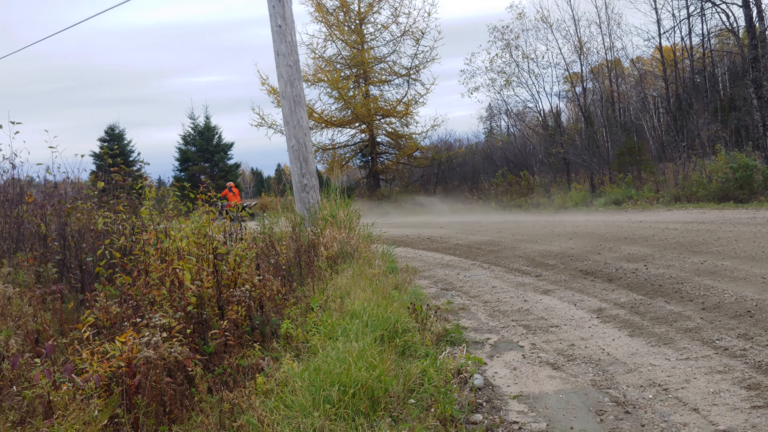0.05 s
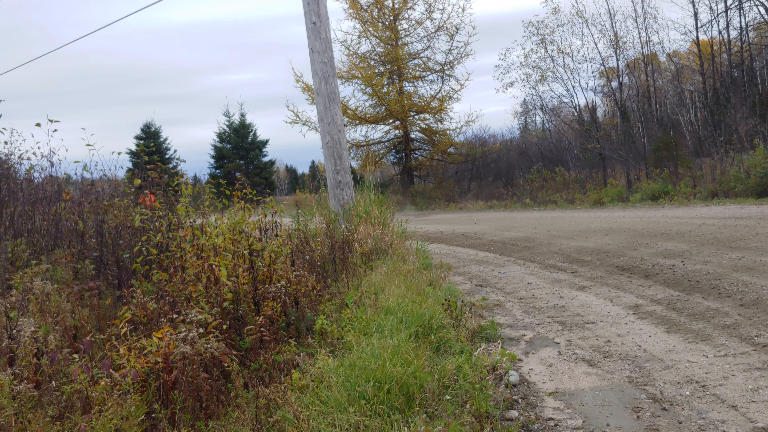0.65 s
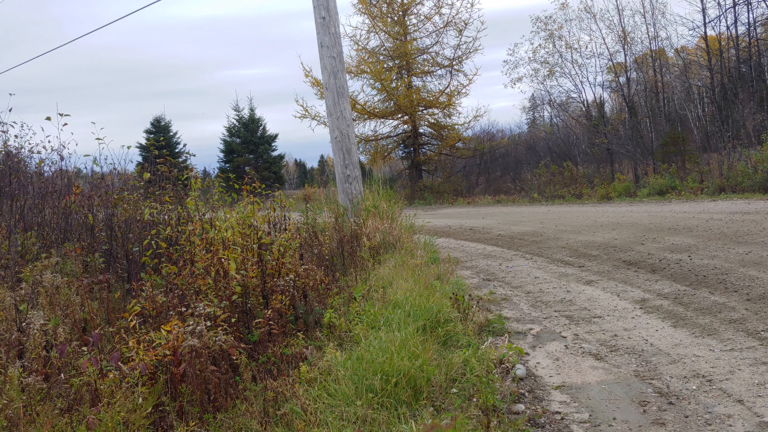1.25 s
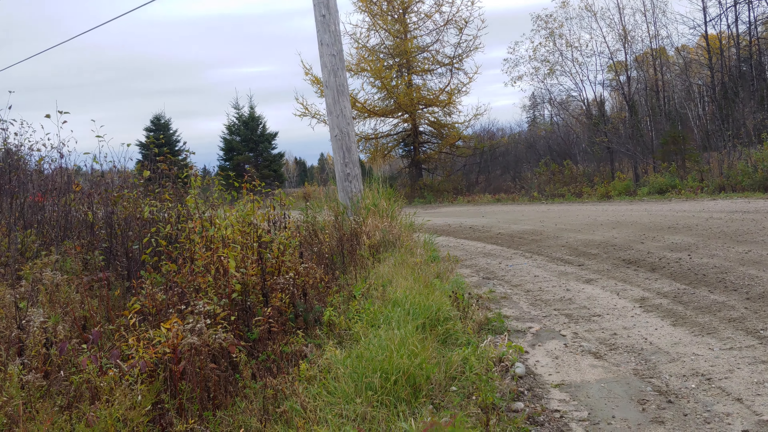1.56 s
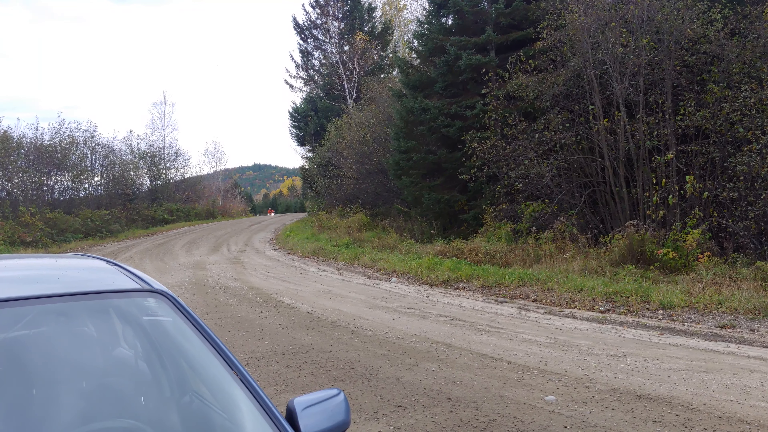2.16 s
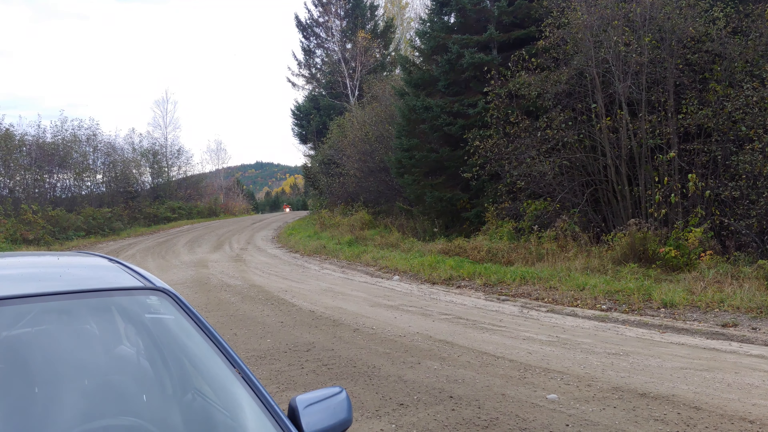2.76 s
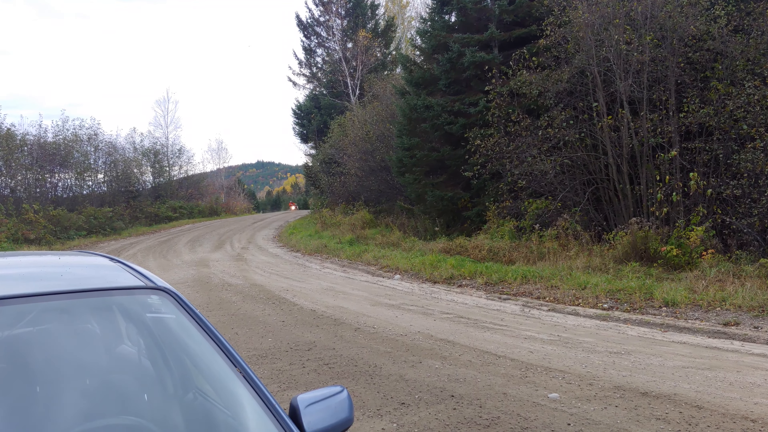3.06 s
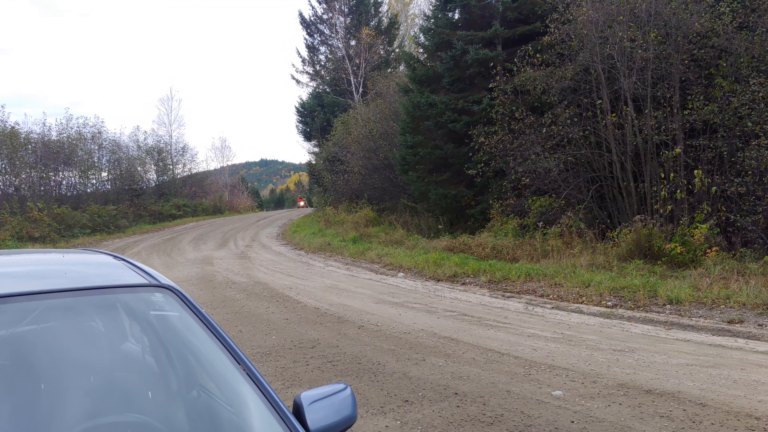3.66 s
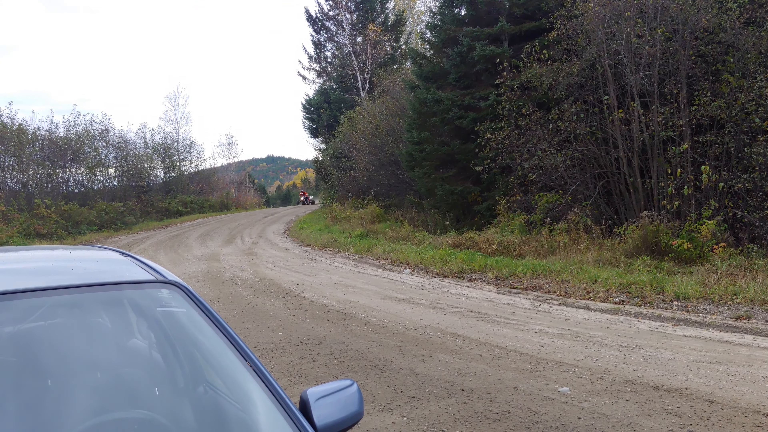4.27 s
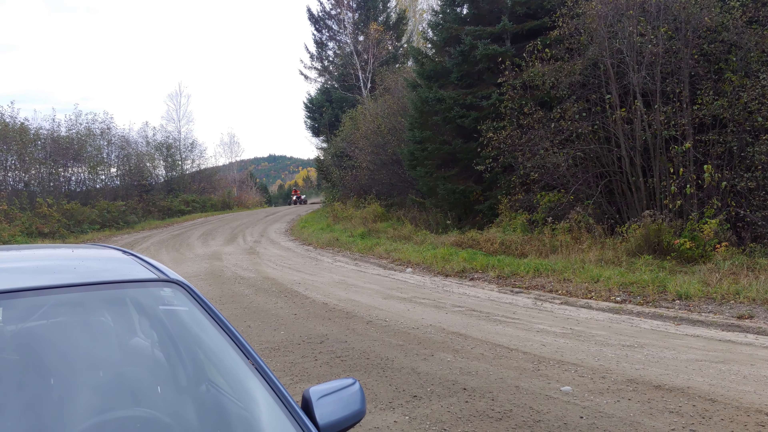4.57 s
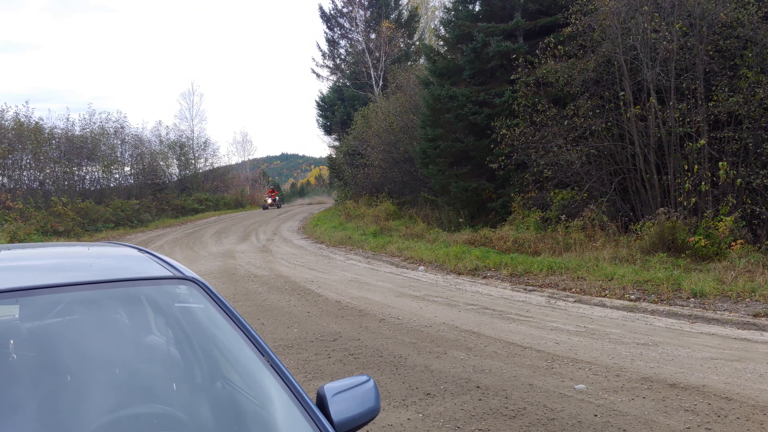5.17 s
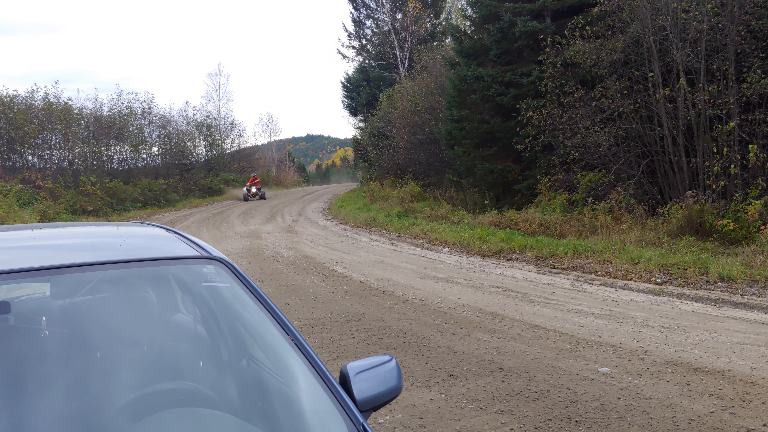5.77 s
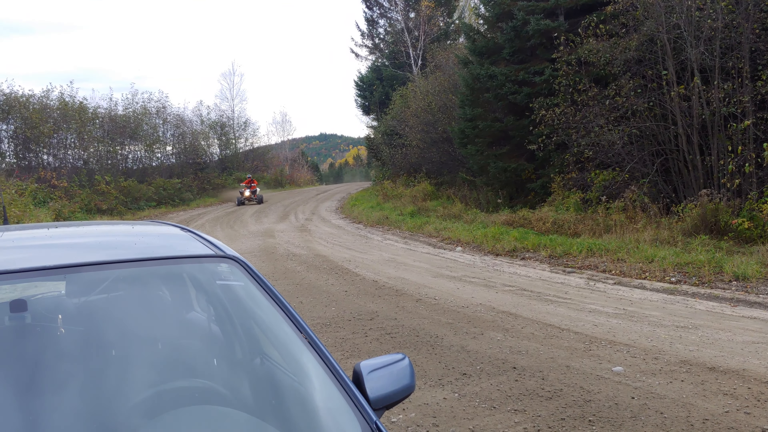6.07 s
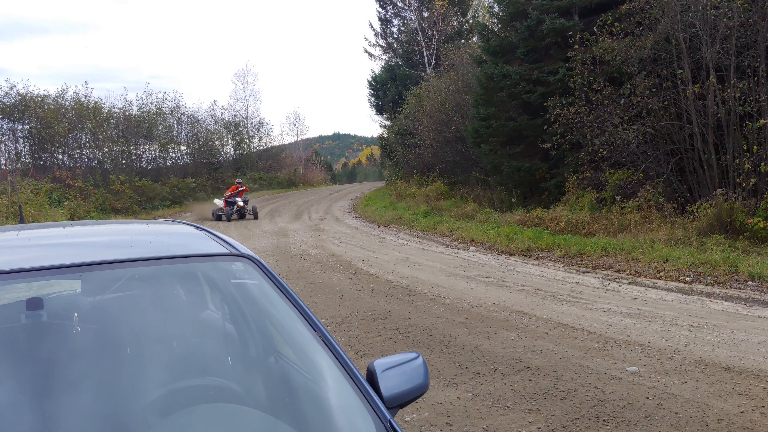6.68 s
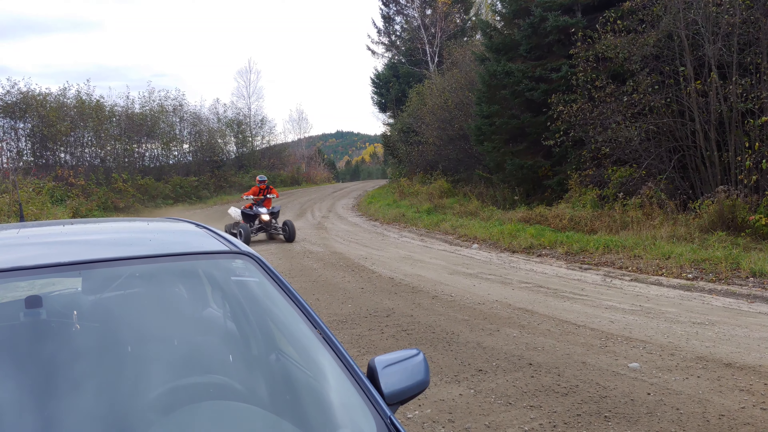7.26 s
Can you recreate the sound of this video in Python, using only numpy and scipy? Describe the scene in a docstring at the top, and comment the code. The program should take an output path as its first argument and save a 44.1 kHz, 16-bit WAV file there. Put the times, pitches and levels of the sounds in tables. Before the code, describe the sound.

From the start, a single-cylinder four-stroke quad bike pulls away outdoors. Its note is deep and loud, with a hard, raspy crack on each firing and a hiss that gradually fades, while the pitch creeps upward. At about 1.5 seconds the sound cuts off abruptly, leaving a short silence. From around 2 seconds the engine fades in far away, dull and droning, and begins to approach. Its pitch rises toward 3.4 seconds, and one small dry tick sounds close to the microphone at about 3.6 seconds. The revs climb and fall back repeatedly, peaking near 4.4, 5.7 and 6.7 seconds, with a surge of growl around 5.3 seconds. The bike grows louder, fuller and raspier as it nears, with a low churn and very faint echoes from the trees. It is still revving when the sound ends at about 7.4 seconds.

```python
"""On a gravel road by a forest, a quad bike with a one-cylinder four-stroke engine is heard twice.
First it pulls away, its exhaust cracking at the listener. After a short silence it fades in far off
and comes closer, the throttle rising and falling; one small tick sounds nearby on the way.
Each firing of the engine is a push of exhaust, a burst of swirling gas and a gulp of fresh air.
The pushes and gulps make the deep note; the gas makes the rasp and hiss."""
import sys
import numpy as np
from scipy import signal
from scipy.fft import rfft, irfft, next_fast_len
from scipy.io import wavfile
from scipy.ndimage import uniform_filter1d, minimum_filter1d, map_coordinates

SR = 44100
rng = np.random.default_rng(int(sys.argv[2]) if len(sys.argv) > 2 else 0)


def master_out(mix):
    """Clip the mix to full scale and print it as 16-bit PCM to the path in sys.argv[1]."""
    frames = np.transpose(np.atleast_2d(mix))
    ceiling = np.clip(frames, -1, 1)
    pcm = np.round(ceiling * 32767).astype(np.int16)
    wavfile.write(sys.argv[1], SR, pcm)


N = 327222
TIME = np.arange(N) / SR
FFT_SIZE = next_fast_len(N + 8192, real=True)
HZ = np.maximum(np.arange(FFT_SIZE // 2 + 1) * SR / FFT_SIZE, 1)

# How fast the engine runs: (time [s], firing rate [Hz])
REVS_AWAY = [(0.0, 52.65), (0.35, 56.03), (0.53, 55.59), (0.98, 57.14), (1.15, 61.22), (1.52, 59.6)]
REVS_TOWARD = [(1.68, 53.9), (2.6, 56.1), (2.86, 57.94), (3.36, 64.27), (3.91, 61.6), (4.39, 72.21),
               (4.86, 69.22), (5.11, 70.16), (5.29, 66.93), (5.59, 71.29), (5.72, 74.65), (5.82, 67.18),
               (6.36, 67.59), (6.73, 75.6), (6.94, 68.14), (7.05, 70.11), (7.18, 66.63), (7.3, 71.68),
               (7.42, 73.47)]
# The tones in the engine's note, from behind, far ahead and near ahead:
# (harmonic [times the firing rate], relative level [dB])
TONES_AWAY = [(1, 9.5), (2, 15), (3, -7), (4, -9), (5, -13), (6, -20), (7, -19.5), (8, -20), (9, -13),
              (10, -15.5), (11, -19.5), (12, -18), (13, -25), (14, -21.5), (15, -19), (16, -16),
              (17, -27.5), (18, -27), (19, -28.5), (20, -45.5), (21, -24.5), (22, -31.5)]
TONES_FAR = [(1, -9), (2, -7.5), (3, -5.5), (4, -5), (5, -6), (6, -4.5), (7, 1), (8, -6.5), (9, -10),
             (10, -8), (11, -9), (12, -16), (13, -9), (14, -23), (15, -37.5), (16, -33.5), (17, -28),
             (18, -41), (19, -31)]
TONES_NEAR = [(1, -6.5), (2, 1.5), (3, -10), (4, -7.5), (5, -2), (6, -11), (7, -24), (8, -18), (9, -9),
              (10, -14.5), (11, -14), (12, -24.5), (13, -32.5), (14, -31.5), (15, -21), (16, -20.5),
              (17, -31.5), (18, -30), (19, -34)]
# Tone colour of the gas and of the low churn of engine and tyres: (frequency [Hz], relative level [dB])
GAS_COLOUR_AWAY = [(450, 7), (650, -2), (900, -1), (1150, -2.5), (1550, 1.5), (2200, 6.5), (3400, -8),
                   (4400, -17), (5600, -21.5), (7000, -20), (7800, -28.5), (8800, -45.5), (11500, -40),
                   (14500, -58)]
GAS_COLOUR_TOWARD = [(800, 8), (1000, -6), (1200, -3.5), (1500, -7), (2100, -2), (2700, -10), (4200, -18.5),
                     (5400, -19.5), (6300, -27), (7050, -22.5), (7900, -35), (8700, -67), (11500, -51),
                     (14500, -67.5)]
CHURN_COLOUR = [(20, -4), (55, -7.5), (95, 16.5), (160, 16.5), (320, 12.5), (450, 11), (700, 11), (900, -5),
                (1200, -48.5)]
# Brief flare-ups of the leaving exhaust: (time [s], bark boost [dB], rasp boost [dB], hiss boost [dB])
EXHAUST_FLARES = [(.19, 0.5, 0, 6.0), (.43, -0.3, 2, 2), (.66, 3.5, 0.5, 1.0), (.93, 4.5, -0.5, 0),
                  (1.02, 2, -1.5, 5.5), (1.23, 1, 1, 6)]
# How alike the noise is in both ears: (frequency [Hz], likeness [ratio, held to 0-1 when used])
EAR_LIKENESS_AWAY = [(500, -0.6), (1000, 13), (2500, -0.6), (7000, 0.4)]
EAR_LIKENESS_TOWARD = [(60, 0.39), (120, 0.93), (240, 0.99), (470, 1), (940, 0.73), (1880, 0.48),
                       (3740, 0.32), (7440, 0.7)]
# Which ear hears more: (frequency [Hz], left minus right [dB])
EAR_BALANCE_AWAY = [(60, 3), (300, .5), (510, 4), (870, 1.5), (1490, -2), (2550, -2), (4350, 13.5),
                    (7000, -8), (10000, 6)]
EAR_BALANCE_TOWARD = [(60, 2), (180, 2), (300, 1), (510, 3), (870, 2), (1490, 0), (2550, -3.5), (4350, 17),
                      (7200, -15.5), (10000, 7)]
# Narrow peaks and dips at each ear: (frequency [Hz], half width [Hz], left [dB], right [dB])
EAR_PEAKS_AWAY = [(1850, 82, -4.5, 2.5), (2060, 160, -1.5, 3), (3850, 190, -1.5, -3.5),
                  (4710, 300, -2, 8.5)]
EAR_PEAKS_TOWARD = [(2050, 370, -3, 2), (2780, 91, 5.5, 2.5), (3500, 51, 4, 2.5), (4200, 180, 2, 8.5),
                    (5400, 150, 5.5, -4), (7300, 100, 3.5, -3.5), (8050, 280, -12.5, 5)]
# The change from the far sound to the near one: (time [s], near share [0-1])
NEAR_SHARE = [(3.1, 0.4), (3.9, 0.38), (4.3, 0.78), (7.4, 1)]
# The deep boom and the mid-pitched bark as the bike comes closer: (time [s], base level [dB])
BOOM_TOWARD = [(2.0, -37.5), (2.9, -27), (4.2, -21.5), (4.7, -19), (5.45, -16.5), (5.68, -14.5), (6.3, -14),
               (7.2, -13.5), (7.42, -14)]
BARK_TOWARD = [(2.0, -44.5), (2.35, -32.5), (3.85, -32), (4.45, -38.5), (4.95, -35.5), (5.4, -26),
               (5.9, -27), (6.45, -25.5), (6.75, -31.5), (7.08, -30), (7.42, -31)]
# The pipe drones at low revs and falls out of tune at high ones: (firing rate [Hz], level over boom [dB])
DRONE_BY_REVS = [(57, -0.9), (63, -2.3), (67.5, -7), (71, -10.5), (75, -10.5)]
# Peaks and dips in the note from far ahead: (frequency [Hz], half width [Hz], boost [dB])
FAR_PEAKS = [(262, 12, 2.5), (335, 13, 1.5), (380, 62, -1.5), (507, 28, -7)]
# A small dry tick close by: (time [s], peak level [dB])
NEARBY_TICKS = [(3.567, -21.0)]

AWAY_ENDS_S, TOWARD_STARTS_S = 1.52, 1.68


def from_db(db):
    """Turn decibels into a number to multiply by."""
    return np.exp(np.asarray(db) * (np.log(10) / 20))


def over_time(table):
    """Join a table's points with straight lines: one value per sample."""
    return np.interp(TIME, *np.transpose(table))


def over_hz(table):
    """Join a table's points with straight lines on an octave scale: one value per frequency."""
    hz, value = np.transpose(table)
    return np.interp(np.log(HZ), np.log(hz), value)


def hump(x, centre, width):
    """A smooth hill of height 1, in time or in frequency."""
    return np.exp(-((x - centre) / width) ** 2)


def band(low_hz, high_hz):
    """Gains that let through only what lies between two frequencies."""
    return 1 / np.sqrt((1 + (low_hz / HZ) ** 16) * (1 + (HZ / high_hz) ** 16))


def colour(sound, gain):
    """Turn each frequency up or down by its own gain."""
    spectrum = rfft(sound.astype(np.float32), FFT_SIZE)
    return irfft(spectrum * gain.astype(np.float32), FFT_SIZE)[..., :N]


def wander(cycles, span=1):
    """A value that glides to a new random number every `span` engine cycles."""
    draws = rng.standard_normal(1024)
    coarse = np.interp(cycles[::8] / span, np.arange(len(draws)), draws)
    return np.repeat(coarse, 8)[:N].astype(np.float32)


def count_cycles(firing_hz, start):
    """Count engine cycles; the exhaust valve opens at each whole number."""
    return np.cumsum(firing_hz) / SR + start + 1


def moving_air(cycles, levels_db, waver_db):
    """Moving air makes each layer's level waver on its own."""
    return [db + waver_db * wander(cycles, span=9) for db in levels_db]


def levels_away():
    """Base levels [dB] of the leaving bike: the boom holds, the drone settles and the hiss fades."""
    flares = sum(np.outer(boosts, hump(TIME, at_s, 0.091)) for at_s, *boosts in EXHAUST_FLARES)
    bark_flare, rasp_flare, hiss_flare = flares
    sag_db = 2.2 * hump(TIME, 0.72, 0.43)   # the low end sags in mid-turn
    boom_db = -14 - sag_db
    drone_db = -24 + 4.5 * hump(TIME, 0, 0.66) - sag_db
    bark_db = -25.5 + 1.5 * hump(TIME, 0.66, 0.31) + bark_flare   # the pipe swings to face the listener
    rasp_db = -25 + rasp_flare
    hiss_db = -29.5 - 4 * TIME + hiss_flare
    return boom_db, drone_db, bark_db, rasp_db, hiss_db


def ground_dip_db(hz):
    """Sound bouncing off the ground cuts a dip into the note; it slides down as the bike leaves."""
    centre_hz = 442 * 2 ** (-0.45 * TIME)
    return 5.5 * hump(hz, centre_hz, 55)


def engine_note(cycles, tone_db, groups, pipe_harmonic, intake, intake_lag, smear, jitter, flutter_db):
    """Tones timed by the exhaust push and later air gulp; groups are (harmonics, joint level [dB])."""
    unevenness = jitter * wander(cycles)   # no two burns take equally long
    angle = (2 * np.pi * (cycles % 1 + unevenness)).astype(np.float32)
    note = np.zeros(N)
    for harmonics, level_db in groups:
        gains = [from_db(tone_db[k - 1]) for k in harmonics]
        scale = from_db(level_db) * np.sqrt(2 / sum(gain ** 2 for gain in gains))
        for k, gain in zip(harmonics, gains):
            pipe_ratio = 1j * k / pipe_harmonic
            push = pipe_ratio / (1 + pipe_ratio) ** 2   # a sharp push, then suction in the pipe
            push *= np.exp(-1j * np.pi * smear * k * k)   # high tones linger in the silencer
            gulp = intake * np.exp(-(k / 3.53) ** 2 - 2j * np.pi * k * intake_lag)
            phase = float(np.angle(push + gulp))
            flutter = from_db(flutter_db * np.sqrt(k) * wander(cycles, span=5))   # air shakes highs most
            note += scale * gain * flutter * np.cos(k * angle + phase)
    return note


def turbulence(cycles, repeat):
    """Two noises that partly repeat from firing to firing, since the gas takes the same path."""
    fresh = rng.standard_normal((2, 560, 1024))   # noise, firing, sample within the firing
    flow = signal.lfilter([np.sqrt(1 - repeat ** 2)], [1, -repeat], fresh, axis=1)
    firing = cycles.astype(int)
    samples_since_firing = np.arange(N) - np.searchsorted(firing, firing)
    return flow[:, firing, samples_since_firing]


def gas_rush(cycles, gain, likeness, repeat, opens_at, rise, steady, uneven_db):
    """Gas bursts that swell for `rise` cycles and die away, over a steady rush; stereo, at 0 dB."""
    burst_cycles = cycles - opens_at
    age = burst_cycles % 1 / rise
    strength = from_db(uneven_db * np.tanh(wander(np.floor(burst_cycles))))
    burst = strength * (age * np.exp(1 - age)) ** 2
    noise = turbulence(cycles, repeat) * np.hypot(burst, steady)
    alike = np.clip(over_hz(likeness), 0, 0.999)
    shared, side = colour(noise, gain * np.sqrt([1 + alike, 1 - alike]))
    stereo = np.array([shared + side, shared - side])
    return stereo / np.sqrt(np.mean(stereo ** 2) + 1e-20)


def ears(sound, balance, peaks):
    """Give each ear a tone colour of its own."""
    broad_db = over_hz(balance) * np.array([[0.5], [-0.5]])
    narrow_db = sum(np.outer(pair_db, hump(HZ, hz, width)) for hz, width, *pair_db in peaks)
    return colour(sound, from_db(broad_db + narrow_db))


def drift_left(sound):
    """As the bike moves off to the left, its sound reaches the right ear ever later."""
    left, right = sound
    lag_s = np.interp(TIME, [0, AWAY_ENDS_S], [0.00007, 0.00017])
    return np.array([left, map_coordinates(right, [(TIME - lag_s) * SR], order=3)])


def pulling_away():
    """The pipe points at the listener: a deep note with a hard crack on every firing."""
    firing_hz = over_time(REVS_AWAY)
    cycles = count_cycles(firing_hz, start=0.16)
    boom_db, drone_db, bark_db, rasp_db, hiss_db = moving_air(cycles, levels_away(), waver_db=-0.35)
    pitched_bark_db = bark_db - 7   # part of the bark is pitched, the rest is rushing gas
    groups = [(range(1, 3), boom_db - 0.6), (range(3, 9), drone_db + 3), (range(9, 23), pitched_bark_db)]
    tone_db = [db - ground_dip_db(k * firing_hz) for k, db in TONES_AWAY]
    note = engine_note(cycles, tone_db, groups, pipe_harmonic=2.3, intake=0.57, intake_lag=0.43,
                       smear=0.0047, jitter=0.0057, flutter_db=0.89)
    gas_colour = from_db(over_hz(GAS_COLOUR_AWAY))
    bark = gas_rush(cycles, gas_colour * band(610, 1340), EAR_LIKENESS_AWAY,
                    repeat=0.4, opens_at=-0.0045, rise=0.12, steady=0.065, uneven_db=0.5)
    rasp = gas_rush(cycles, gas_colour * band(1200, 4700), EAR_LIKENESS_AWAY,
                    repeat=0.33, opens_at=0.00064, rise=0.097, steady=0.18, uneven_db=4.5)
    hiss = gas_rush(cycles, gas_colour * band(3550, 14000), EAR_LIKENESS_AWAY,
                    repeat=0.31, opens_at=-0.011, rise=0.1, steady=0.17, uneven_db=5.5)
    gas = from_db(bark_db) * bark + from_db(rasp_db - 0.7) * rasp + from_db(hiss_db - 0.06) * hiss
    burn_strength = from_db(0.77 * wander(cycles))
    return drift_left(ears(burn_strength * (note + gas), EAR_BALANCE_AWAY, EAR_PEAKS_AWAY))


def throttle_db(firing_hz):
    """The rasp hardens while the throttle is open and the revs climb."""
    climb_hz_per_s = uniform_filter1d(np.gradient(firing_hz) * SR, size=int(0.14 * SR) + 1)
    return 0.03 * np.maximum(climb_hz_per_s, 0)


def levels_toward(firing_hz, near):
    """Base levels [dB] of the nearing bike: rasp and hiss gain on the boom as the distance shrinks."""
    last_distance_m, closing_m_per_s = 6.4, 16.5
    distance_doublings = np.log2(1 + closing_m_per_s * (TIME[-1] - TIME) / last_distance_m)
    boom_db, bark_db = over_time(BOOM_TOWARD), over_time(BARK_TOWARD)
    drone_db = boom_db + np.interp(firing_hz, *np.transpose(DRONE_BY_REVS))
    rasp_db = boom_db - 9.5 - 1.54 * distance_doublings + throttle_db(firing_hz)
    hiss_db = boom_db - 16 - 0.5 * distance_doublings
    hiss_db += 0.46 * (firing_hz - 70.6)   # faster firing hisses more
    hiss_db -= 12.5 * (1 - near)   # the trees at the bend hide the hiss
    # once faded in, the hiss never drops below a faint, steady level
    hiss_db = 20 * np.log10(np.hypot(from_db(hiss_db), from_db(-60.5)))
    fade_in_db = 63.5 * np.clip(TIME - 1.988, -1, 0)
    return [db + fade_in_db for db in (boom_db, drone_db, bark_db, rasp_db, hiss_db)]


def note_from_ahead(cycles, near, boom_db, drone_db, bark_db):
    """The engine's note with a strong intake gulp, blending from its far sound to its near one."""
    tone_db = [far_db + near * (near_db - far_db)
               for (_, far_db), (_, near_db) in zip(TONES_FAR, TONES_NEAR)]
    tone_db[0] -= 12 * np.clip((1.8 - TIME) / 0.02, 0, 1)   # the lowest tone comes in last
    pitched_bark_db = bark_db - 0.2 - 1.6 * near   # close by, part of the bark is churning noise
    groups = [(range(1, 4), boom_db), (range(4, 7), drone_db), (range(7, 20), pitched_bark_db)]
    note = engine_note(cycles, tone_db, groups, pipe_harmonic=4.46, intake=1.0, intake_lag=0.4787,
                       smear=0.0062, jitter=0.0069, flutter_db=0.82)
    note = colour(note, from_db(1.5 * hump(HZ, 301, 50)))   # the pipe favours tones near 301 Hz
    far_peaks_db = sum(db * hump(HZ, hz, width) for hz, width, db in FAR_PEAKS)
    return near * note + (1 - near) * colour(note, from_db(far_peaks_db))


def dulled_by_distance(hiss, hiss_db):
    """Distance swallows the very top first, so the fainter the hiss, the duller it is."""
    sizzle = colour(hiss, band(9000, SR))
    share_left = from_db(2.1 * np.minimum(hiss_db + 33, 0))
    return hiss - (1 - share_left) * sizzle


def forest_echoes(sound, echo_db, delays_s):
    """The forest edge throws back a few weak echoes, mostly of the middle range."""
    echoes = sum(np.exp(-2j * np.pi * HZ * delay) for delay in delays_s)
    return colour(sound, 1 + from_db(echo_db) * band(400, 4500) * echoes)


def coming_closer():
    """The pipe points away: the intake leads, and the trees smear the cracks into a throbbing rasp."""
    firing_hz, near = over_time(REVS_TOWARD), np.clip(over_time(NEAR_SHARE), 0, 1)
    cycles = count_cycles(firing_hz, start=0.12)
    levels_db = levels_toward(firing_hz, near)
    boom_db, drone_db, bark_db, rasp_db, hiss_db = moving_air(cycles, levels_db, waver_db=0.7)
    note = note_from_ahead(cycles, near, boom_db, drone_db, bark_db)
    gas_colour = from_db(over_hz(GAS_COLOUR_TOWARD))
    churn = gas_rush(cycles, from_db(over_hz(CHURN_COLOUR)), EAR_LIKENESS_TOWARD,
                     repeat=0.1, opens_at=-0.0066, rise=0.36, steady=1.1, uneven_db=-0.5)
    rasp = gas_rush(cycles, gas_colour * band(910, 3700), EAR_LIKENESS_TOWARD,
                    repeat=0.36, opens_at=-0.02, rise=0.13, steady=0.86, uneven_db=3.0)
    growl = gas_rush(cycles, gas_colour * band(810, 1400), EAR_LIKENESS_TOWARD,
                     repeat=0.4, opens_at=-0.02, rise=0.21, steady=0.91, uneven_db=3.5)
    hiss = gas_rush(cycles, gas_colour * band(3110, 14000), EAR_LIKENESS_TOWARD,
                    repeat=0.047, opens_at=-0.02, rise=0.24, steady=1.4, uneven_db=5.5)
    growl_db = bark_db - 16 + 14.5 * hump(TIME, 5.3, 0.41)   # it surges briefly with a blip of the throttle
    bike = note + from_db(rasp_db + 1.3) * churn + from_db(rasp_db - 1.2) * rasp
    bike += from_db(growl_db) * growl + from_db(hiss_db - 2.5) * dulled_by_distance(hiss, hiss_db)
    burn_strength = from_db(0.58 * wander(cycles))
    with_echoes = forest_echoes(burn_strength * bike, echo_db=-23, delays_s=[0.037, 0.064, 0.109])
    return ears(with_echoes, EAR_BALANCE_TOWARD, EAR_PEAKS_TOWARD)


def tick():
    """A tiny hard contact that hardly rings."""
    click = np.zeros(N)
    for at_s, peak_db in NEARBY_TICKS:
        click[round(at_s * SR)] = from_db(peak_db)
    bright_band = signal.butter(4, [1300, 6000], "band", fs=SR, output="sos")
    ring = signal.sosfilt(bright_band, click + 1e-18)
    return ring * click.max() / np.abs(ring).max()


def scene():
    """The sound of the leaving bike stops dead; after a moment of silence the bike comes closer."""
    away_gain = np.clip(np.minimum(TIME / 0.012, (AWAY_ENDS_S - TIME) / 0.001), 0, 1)
    toward_gain = np.clip((TIME - TOWARD_STARTS_S) / 0.02, 0, 1)
    bike = away_gain * pulling_away() + toward_gain * coming_closer()
    faint_hiss = from_db(-94.5) * rng.standard_normal((2, N))
    return bike + tick() + faint_hiss


def record(dry):
    """Turn the hardest cracks down for an instant (a limiter), then cut the highest treble."""
    safe_gain = 1 / np.maximum(np.abs(dry).max(axis=0), 1)
    smooth_gain = uniform_filter1d(minimum_filter1d(safe_gain, size=129), size=129)
    treble_cut = signal.cheby2(12, 70, 16000, fs=SR, output="sos")
    return signal.sosfilt(treble_cut, dry * smooth_gain)


dry = scene()
out = record(dry)
master_out(out)
```